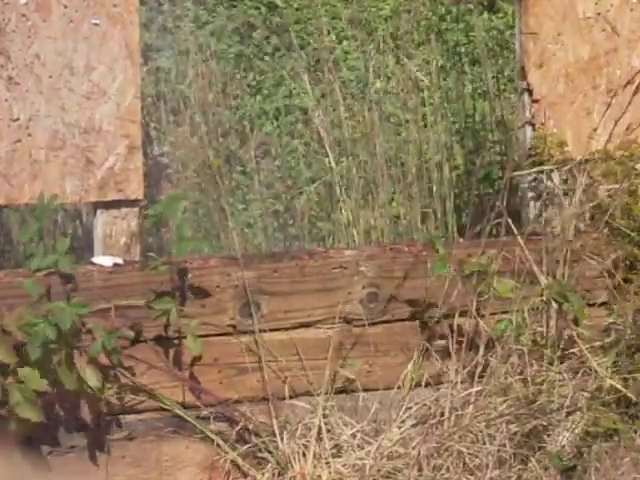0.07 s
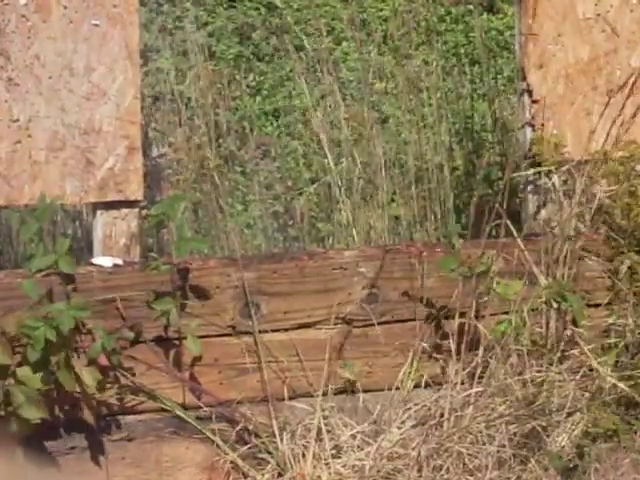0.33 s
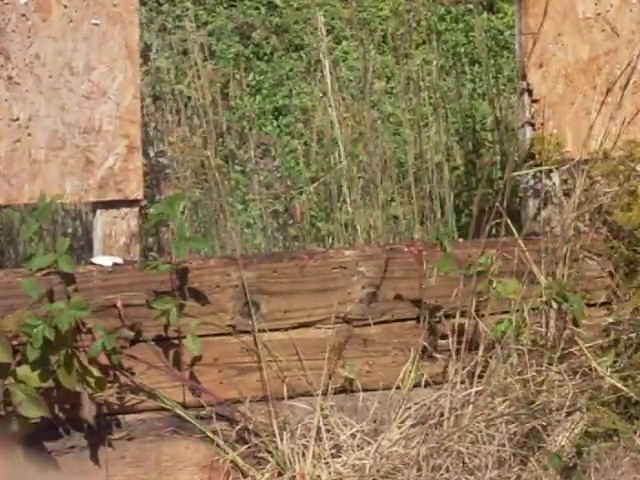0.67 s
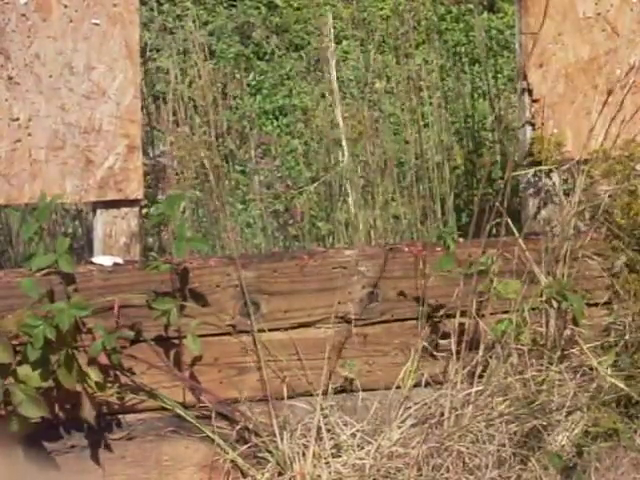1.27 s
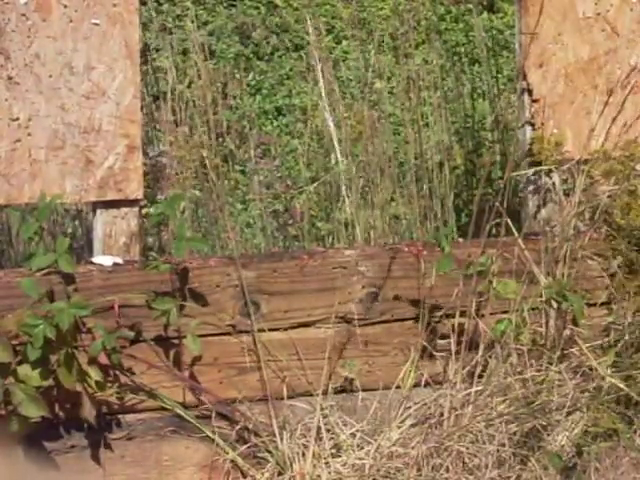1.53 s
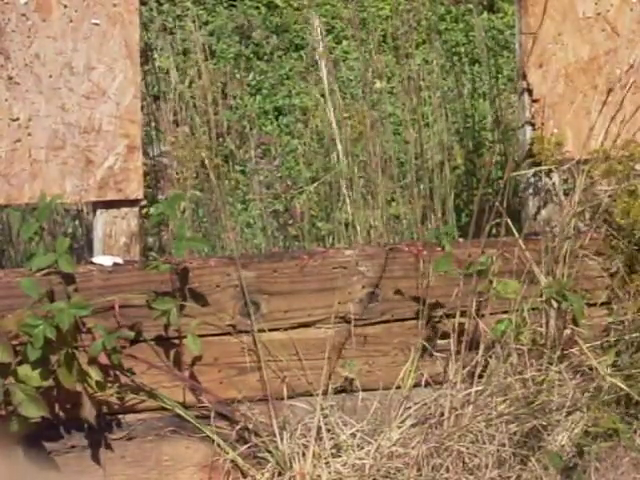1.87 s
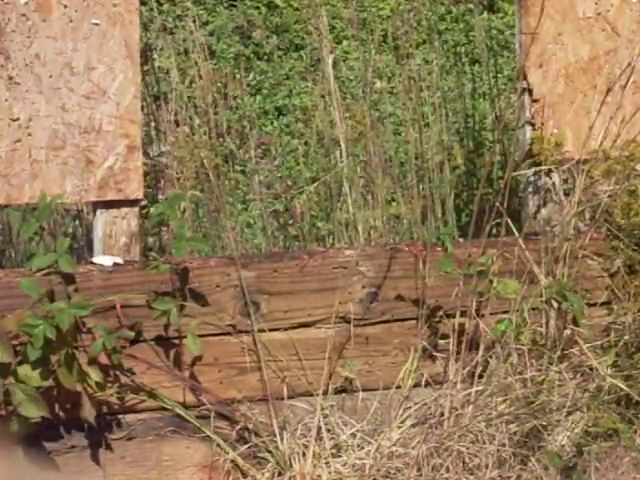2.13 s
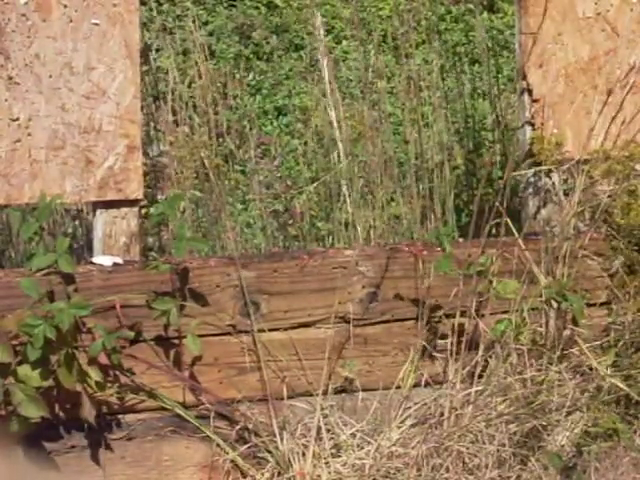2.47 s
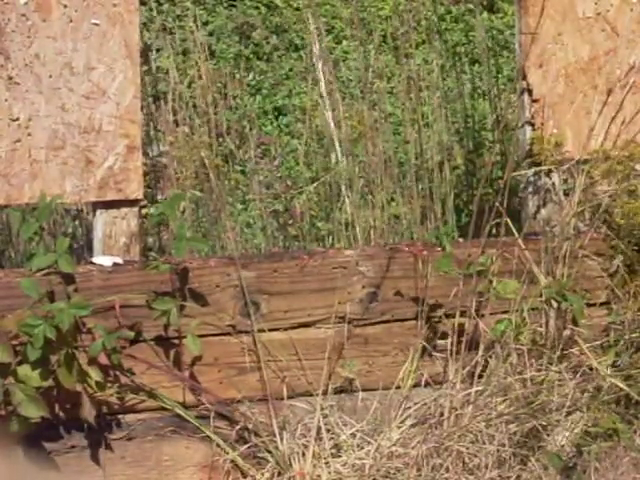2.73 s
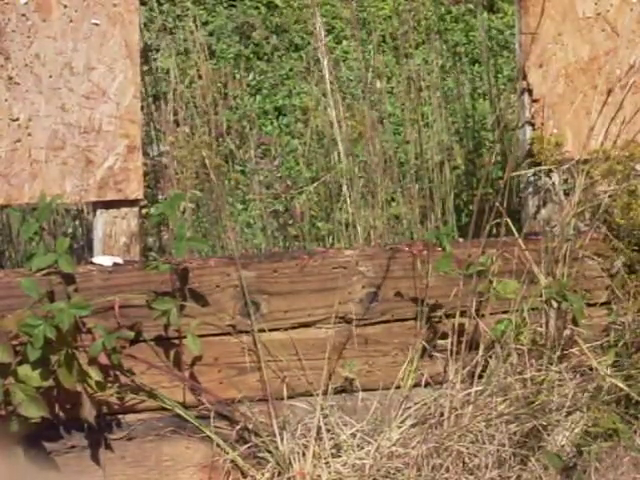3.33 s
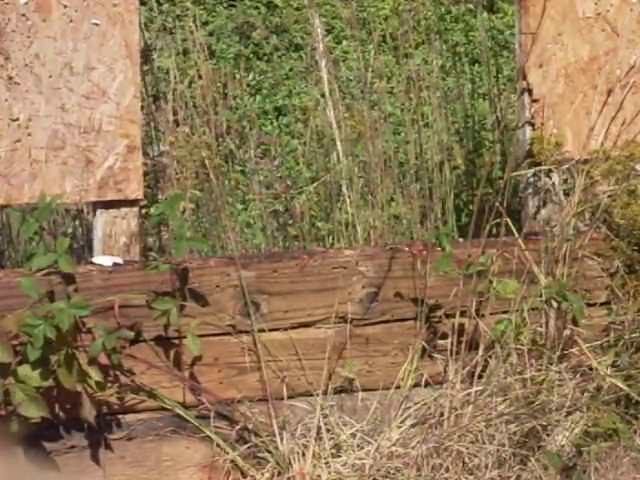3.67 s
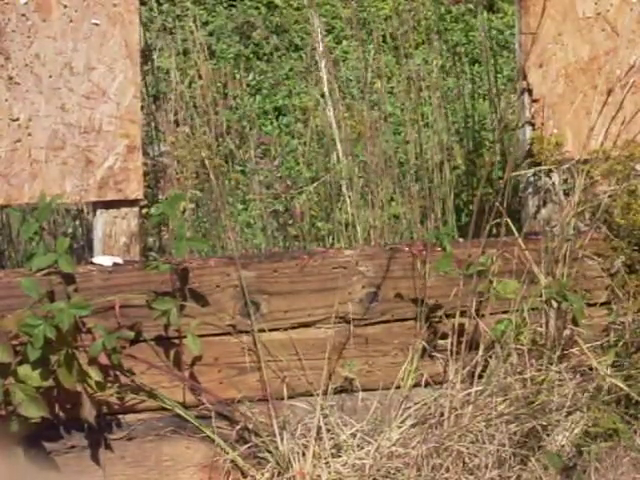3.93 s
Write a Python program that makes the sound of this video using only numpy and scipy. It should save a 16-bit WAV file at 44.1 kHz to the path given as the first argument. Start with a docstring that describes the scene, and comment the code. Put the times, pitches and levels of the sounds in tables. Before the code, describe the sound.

A pump shotgun is handled with small clicks while faint distant shots sound outdoors. It is then racked with two sharp clacks and fires once, close to a dull microphone that overloads on the blast.

```python
"""A pump shotgun at an outdoor range

An earlier shot dies away, far reports roll in and the gun clicks as it is handled. The slide is racked
back and forward, pinging the steel and knocking the stock. The hammer falls, and the blast sets boards
and timber ringing. It is all heard through a small camera close by: its microphone is dull, the blast
overloads it, and a steady low ticking, probably its own motor, runs underneath."""
import sys
import numpy as np
from scipy import signal
from scipy.fft import rfft, irfft
from scipy.io import wavfile
from scipy.ndimage import uniform_filter1d

SR = 44100
rng = np.random.default_rng(int(sys.argv[2]) if len(sys.argv) > 2 else 0)


def digitize_waveform(pressure):
    """Quantize a signal to 16-bit integers and store it at the path in sys.argv[1].

    Rows of a 2-D input are taken as channels; values are limited to [-1, 1].
    """
    field = np.atleast_2d(pressure).T
    bounded = np.clip(field, -1, 1)
    quanta = np.round(bounded * 32767).astype(np.int16)
    wavfile.write(sys.argv[1], SR, quanta)


N = 176400
T = np.arange(N) / SR

# A tone table shapes a noise. Each row: frequency in Hz, level in dB compared with the other rows.
AIR_TONE = [(20, 13.5), (100, -11), (300, 8.5), (800, 0.5), (1400, -7.5), (2000, -4), (2600, -9),
            (3200, -6), (3800, -9.5), (4500, -23)]  # the outdoor air
REPORT_TONE = [(150, -24), (550, -17), (850, -5.5), (1200, -14.5), (1530, -7.5), (1850, -8), (2180, -9.5),
               (2400, -4.5), (2650, -8.5), (3150, -2.5), (3700, -8), (4500, -25.5)]  # a far report
ECHO_TONE = [(200, -8.5), (600, -3), (1300, -2.5), (2200, 2.5), (3300, 4), (3900, -0.5), (4500, -13)]  # the echo of the surroundings
RUB_TONE = [(100, 0), (350, -9), (600, 9), (1080, 8), (1400, -15), (2000, 9.5), (2700, 8.5), (3300, 16),
            (3800, 6), (4500, -9)]  # the slide rubbing
CRACK_TONE = [(100, -20), (450, 0), (1000, -16), (1500, 0.5), (2050, 0.5), (2650, 6), (3200, 7.5),
              (3800, 1), (4500, 2)]  # a blow on steel
HAMMER_TONE = [(100, -10), (400, 10.5), (900, 5.5), (2000, -4), (3500, 1), (4500, -14)]  # the hammer falling
MUZZLE_TONE = [(500, -14), (1400, -1.5), (2300, 0.5), (3000, -2.5), (3800, -4), (4500, -17)]  # the first crack from the muzzle

# Bands of fading noise. Each row: frequency in Hz, relative level in dB, seconds to fade by 60 dB.
ROLL_BANDS = [(100, -4, 2.1), (300, 8, 4.3), (810, 16, 0.78), (1300, -3, 8.4), (3230, -10, 4.7),
              (4500, -18, 2.4)]  # the dying roll of an earlier shot
BLAST_BANDS = [(40.5, -5, 0.26), (150, -18.5, 0.76), (230, -6.5, 1.7), (544, -4.5, 3.2), (845, 0.5, 2),
               (1330, -3, 1.1), (2160, -2.5, 0.42), (3720, 1.5, 0.27), (4500, -23, .18)]  # the close blast

# Notes of a struck object. Each row: pitch in Hz, relative level in dB, seconds to fade by 60 dB.
STEEL_NOTES = [(2510, -6.5, 0.0085), (2549, 0, 0.024), (2952, -3.5, 0.033), (3215, -14, 0.034),
               (3497, 1, 0.02), (3813, 7, 0.015)]  # the receiver, the gun's steel body
STOCK_NOTES = [(407, -15.5, 0.25), (542, 4, 0.015), (690, 1, 0.06), (851, 3.5, 0.057), (958, -0.5, .05),
               (1303, 5, 0.028), (1600, 6, 0.039)]  # the stock, which rests on the shoulder
TIMBER_NOTES = [(209.2, -16, 0.52), (367.6, -22.5, 6.2), (741, -20, 1.3), (771, -14, 1.5),
                (815, -16.5, 1.2), (875, -11.5, 0.51), (899, -9, 0.23), (1188, -19, 0.81), (1286, -16, 1.2),
                (1645, -20.5, 1.2), (2007, -21.5, 0.77)]  # boards and timber nearby

# Ticks in one turn of the motor. Each row: delay in seconds, strength with a sign,
# then rise, decay and timing scatter, all in seconds.
MOTOR_TICKS = [(.0072, -.068, .0011, .0018, .001), (.012, .012, .002, .004, .002),
               (.0212, .015, .0003, .0018, .0014), (.0406, -.022, .0002, .0012, .0003),
               (.0549, .029, .0002, .0014, .00015)]
# Far reports and echoes. Each row: start in seconds, level in dB, rise and decay in seconds,
# tilt toward the treble in dB per octave.
FAR_REPORTS = [(0, -39, 0.0085, 0.069, -6), (.112, -47.5, 0.0074, 0.12, 0), (0.313, -48, 0.022, 0.032, -1),
               (.418, -34.5, 0.0093, 0.062, -3.5), (1.168, -27, 0.015, 0.04, 3),
               (1.722, -45.5, 0.016, 0.13, 0.5), (1.872, -42, 0.0051, 0.029, -6.5)]
# The ringing they leave. Each row: pitch in Hz, width in Hz, relative level in dB.
REPORT_RESONANCES = [(1015, 86, 0.5), (1380, 26, 2), (1942, 37, 0), (3070, 24, -7)]
# Handling clicks. Each row: start in seconds, level in dB, decay in seconds, centre of the bright band
# in Hz, its width in octaves, level of the broad noise under it in dB compared with that band.
HANDLING_CLICKS = [(.858, -42, 0.0056, 2610, 0.39, -28), (.935, -33.5, 0.016, 1694, 0.048, -23),
                   (.946, -29.5, 0.0052, 3060, 0.16, -18), (0.96, -41, 0.025, 2900, 0.24, 8),
                   (0.9859, -22, 0.0024, 1810, 0.24, -8), (0.9888, -29, 0.0047, 1850, 0.3, -10),
                   (1.005, -38.5, 0.0071, 1660, 0.25, -3), (1.344, -32, 0.0013, 1850, 0.28, -19.5),
                   (2.969, -48, 0.0099, 3300, .3, 3), (3.171, -41.5, 0.003, 2200, 0.44, -5),
                   (3.025, -32.5, 0.0028, 890, 0.37, -35)]
# How hard the slide rubs. Each row: time in seconds, level in dB.
RUB_LEVELS = [(3.33, -34), (3.35, -29), (3.39, -23), (3.42, -33.5), (3.45, -25), (3.472, -30),
              (3.50, -35.5), (3.515, -23), (3.565, -20.5), (3.60, -42)]
# Blows inside the gun. Each row: start in seconds, steel level in dB, ping in Hz, stock level in dB.
SLIDE_BLOWS = [(3.338, -15, 3240, -29), (3.3443, -4.5, 3134, -18), (3.3646, -12.5, 2860, -36),
               (3.3709, -8.5, 3340, -19), (3.3824, -2, 3880, -20), (3.3859, -6.5, 3320, -5),
               (3.3893, -2.5, 3183, -12), (3.394, -8, 3337, -6.5), (3.4041, -14.5, 3055, -21.5),
               (3.4087, -9, 3040, -26), (3.4263, -9.5, 3180, -15.5), (3.4363, -12, 3330, -14.5),
               (3.453, -19, 3160, -30), (3.4792, -19.5, 3260, -34.5), (3.5069, -12.5, 3335, -26),
               (3.5112, -9, 3395, -11), (3.5156, -9.5, 3670, -16), (3.519, -11, 3100, -17),
               (3.525, -10.5, 3180, -34), (3.5304, -10, 3300, -23), (3.5382, -15, 3550, -27),
               (3.542, -12, 3410, -27), (3.5473, -21, 3220, -22), (3.552, -18, 3070, -16),
               (3.5583, -2, 3658, -11.5), (3.5625, -3.5, 2580, -6), (3.5677, -4.5, 3213, -8)]
# The slide hits its rear and front stops. Each row: start in seconds, level in dB, pitch in Hz.
SLIDE_STOPS = [(3.3879, -15, 170), (3.5613, -11.5, 243)]


def amp(db):
    """Turns decibels into a number to multiply by."""
    return 10 ** (np.asarray(db) / 20)


def unit(x):
    """Scales a sound to an average (rms) level of 1."""
    return x / np.sqrt(np.mean(x ** 2) + 1e-20)


def add(mix, start_s, sound):
    """Lays a sound into the mix."""
    part = mix[max(round(start_s * SR), 0):][:len(sound)]
    part += sound[:len(part)]


def level_at(tone, hz):
    """Looks up a tone table's dB between its rows."""
    columns = np.transpose(tone)
    return np.interp(np.log(hz + 1), np.log(columns[0] + 1), columns[1])


def dull(tone):
    """Adds a very quiet row above the microphone's range."""
    return list(tone) + [(5500, -70, *tone[-1][2:])]


def noise(tone, size=N):
    """Noise at level 1 with the given tone and no high treble."""
    hz = np.fft.rfftfreq(size, 1 / SR)
    phases = np.exp(2j * np.pi * rng.random(len(hz)))
    return unit(irfft(amp(level_at(dull(tone), hz)) * phases, size))


def fading_noise(bands, size=N):
    """Noise whose bands each fade at their own speed."""
    hz, spectrum = np.fft.rfftfreq(size, 1 / SR), rfft(noise(bands, size))
    centres, _, fades = np.transpose(dull(bands))
    out = np.zeros(size)
    for fade_s, this_band in zip(fades, np.eye(len(centres))):
        share = np.interp(np.log(hz + 1), np.log(centres), this_band)
        out += irfft(spectrum * share, size) * amp(-60 * T[:size] / fade_s)
    return out


def ring(notes, detune=0, size=8192):
    """Fading notes, each off pitch by a random fraction up to detune."""
    t, draws = T[:size], rng.uniform(-1, 1, (len(notes), 2))
    return sum(amp(db - 60 * t / fade_s) * np.sin(2 * np.pi * hz * (1 + detune * shift) * t + np.pi * phase)
               for (hz, db, fade_s), (shift, phase) in zip(notes, draws))


def ping(hz, peak_s):
    """A heavily damped part: a few cycles that swell to 1 and die at once."""
    t = T[:8192]
    swell = (t / peak_s * np.exp(1 - t / peak_s)) ** 2
    return swell * np.sin(2 * np.pi * (hz * t + rng.random()))


def strike(x):
    """Gives a sound the energy of 5 ms (220 samples) at level 1/2."""
    return .5 * x / np.sqrt(np.sum(x ** 2) / 220)


def burst(t, rise_s, decay_s):
    """A loudness curve: a straight rise, then a smooth fall."""
    return np.minimum(t / rise_s, 1) * np.exp(-np.maximum(t - rise_s, 0) / decay_s)


def air():
    """The outdoor air is a faint, steady noise."""
    return amp(-54.5) * noise(AIR_TONE)


def camera_motor(turn_hz=14.97, spread_db=1.3, strays_per_s=55, busiest_s=.03, busy_width_s=.014):
    """Soft ticks repeat with every turn; sharper stray ticks bunch up in mid-turn."""
    out, t = np.zeros(N), T[:1500]
    for turn in np.arange(0, N / SR, 1 / turn_hz):
        for delay, strength, rise, decay, scatter in MOTOR_TICKS:
            late, loud = rng.standard_normal(2)
            tick = (1 - np.exp(-t / rise)) * np.exp(-t / decay)
            add(out, turn + delay + scatter * late, strength * amp(spread_db * loud) * tick)
    busy = np.exp(-.5 * ((T % (1 / turn_hz) - busiest_s) / busy_width_s) ** 2)
    chance = busy / busy.mean() * strays_per_s / SR
    strays = (rng.random(N) < chance) * rng.choice([-1, 1], N)
    stray_tick = (1 - np.exp(-t / .0001)) / (1 + (t / .00052) ** 4)  # about half a millisecond long
    return out + .02 * signal.fftconvolve(strays, stray_tick)[:N]


def earlier_shot():
    """An earlier shot rolls away and still rings in the timber."""
    out = amp(-38.5) * fading_noise(ROLL_BANDS)
    add(out, 0, amp(-34.5) * ring(TIMBER_NOTES, size=SR))
    return out


def far_reports():
    """Distant bangs arrive smeared and leave a few pitches ringing."""
    out, t, hz = np.zeros(N), T[:SR], np.geomspace(100, 4600, 900)
    ring_power = sum(amp(db) ** 2 / (1 + 2 * ((hz - pitch) / width) ** 2) ** 2
                     for pitch, width, db in REPORT_RESONANCES)
    ring_tone = list(zip(hz, 10 * np.log10(ring_power)))
    for start, db, rise, decay, tilt in FAR_REPORTS:
        tilted_db = level_at(REPORT_TONE, hz) + tilt * np.log2(hz / hz.mean())
        crack = noise(list(zip(hz, tilted_db)), SR) * burst(t, rise, decay)
        ringing = amp(-9) * noise(ring_tone, SR) * burst(t, rise_s=.022, decay_s=.07)
        add(out, start, amp(db) * (crack + ringing))
    return out


def outdoor_echo(sound, rise_s=.024, fade_s=.85):
    """Brush and grass scatter the sound into a pitchless echo that follows its power."""
    tail = (np.minimum(T[:SR] / rise_s, 1) * amp(-60 * T[:SR] / fade_s)) ** 2
    power = signal.fftconvolve(sound ** 2, tail / tail.sum())[:N]
    return amp(-30.5) * noise(ECHO_TONE) * np.sqrt(abs(power))


def handling(top_hz=4100):
    """Handling the gun makes small dry clicks, each with one bright band."""
    out, hz = np.zeros(N), np.geomspace(128, 4700, 200)
    treble_cut = 1 / np.hypot(1, (hz / top_hz) ** 10)
    for start, db, decay, centre, width, body_db in HANDLING_CLICKS:
        bright = 1 / (1 + (np.log2(hz / centre) / width) ** 2) ** 2
        tone_db = 20 * np.log10(treble_cut * (amp(body_db) + bright))
        fade = burst(T[:4096], rise_s=.0012, decay_s=decay)
        click = noise(list(zip(hz, tone_db)), len(fade)) * fade
        add(out, start, amp(db) * click * np.linalg.norm(fade) / np.linalg.norm(click))
    return out


def slide_clacks(rise_s=.0028, crack_s=.0017):
    """Each blow pings the steel and knocks the stock, and both ring on; the stops jolt the whole gun."""
    out, t = np.zeros(N), T[:8192]
    swell = 1 - np.exp(-(t / rise_s) ** 2)
    for start, steel_db, ping_hz, stock_db in SLIDE_BLOWS:
        crack = amp(-3) * strike(noise(CRACK_TONE, len(t)) * swell * np.exp(-t / crack_s))
        steel = ping(ping_hz, peak_s=.0018) + crack
        steel += amp(-6.5) * strike(ring(STEEL_NOTES, detune=.043) * swell)
        stock = ping(hz=1035, peak_s=.0022)
        stock += amp(-1.5) * strike(ring(STOCK_NOTES, detune=.02) * swell)
        add(out, start, amp(steel_db) * steel + amp(stock_db) * stock)
    for start, db, hz in SLIDE_STOPS:
        add(out, start, amp(db) * ping(hz, peak_s=.0018))
    return out


def slide_rub(grain_db=2.5):
    """The moving slide rubs with a grainy scrape."""
    flicker = unit(uniform_filter1d(rng.standard_normal(N), size=90))
    grain = unit(amp(grain_db * flicker))
    level_db = np.interp(T, *np.transpose(RUB_LEVELS), left=-np.inf, right=-np.inf)
    return noise(RUB_TONE) * grain * amp(level_db)


def shot(hammer_at_s=3.8615, fire_at_s=3.8762, push_hz=400.5):
    """The hammer falls, a low push swells, the muzzle cracks, then the blast sets the timber ringing."""
    out, t = np.zeros(N), np.arange(0, fire_at_s - hammer_at_s, 1 / SR)
    hammer = amp(-24) * noise(HAMMER_TONE)[:len(t)]
    push = amp(-9.5) * np.exp((t - t[-1]) / .0037) * np.sin(2 * np.pi * push_hz * t)
    add(out, hammer_at_s, hammer + push)
    muzzle_crack = amp(-5) * noise(MUZZLE_TONE) * np.exp(-T / .018)
    add(out, fire_at_s, muzzle_crack)
    timber = ring(TIMBER_NOTES) * np.minimum(T[:8192] / .015, 1)  # builds up over 15 ms
    blast = amp(-5) * fading_noise(BLAST_BANDS, len(timber))
    add(out, fire_at_s, blast + timber)
    return out


def scene():
    """Mixes the gun, its echo and the background into one channel."""
    gun = slide_clacks() + slide_rub() + shot()
    mix = gun + outdoor_echo(gun) + handling() + earlier_shot() + far_reports() + camera_motor() + air()
    return mix[None]


def record(dry, mic_hz=3980, edge_hz=4520, clip_at=.73, rounding_hz=8500, top_hz=16000):
    """A dull microphone feeds an input that clips the loud blows and rounds off the corners."""
    x = signal.sosfilt(signal.butter(1, 10, "high", fs=SR, output="sos"), dry)  # cuts below 10 Hz
    hz = np.fft.rfftfreq(2 * N, 1 / SR)
    treble_cut = 1 / np.sqrt(1 + (hz / mic_hz) ** 24) / np.sqrt(1 + (hz / edge_hz) ** 120)
    muffled = irfft(rfft(x, 2 * N) * treble_cut)[:, :N]
    clipped = muffled / (1 + abs(muffled / clip_at) ** 18) ** (1 / 18)  # a high power clips sharply
    smoothing = np.exp(-2 * np.pi * rounding_hz / SR)
    rounded = signal.lfilter([1 - smoothing], [1, -smoothing], clipped)
    band_limit = signal.firwin(255, top_hz, window=("kaiser", 9), fs=SR)
    return signal.oaconvolve(rounded, band_limit[None], "same")


dry = scene()
out = record(dry)
digitize_waveform(out)
```